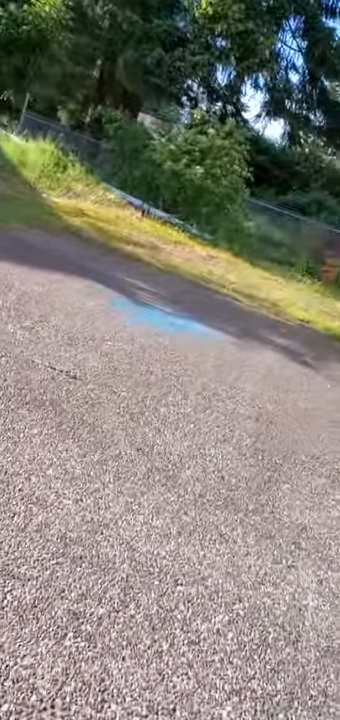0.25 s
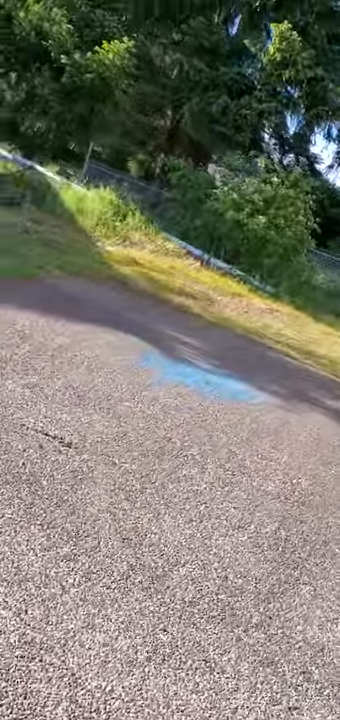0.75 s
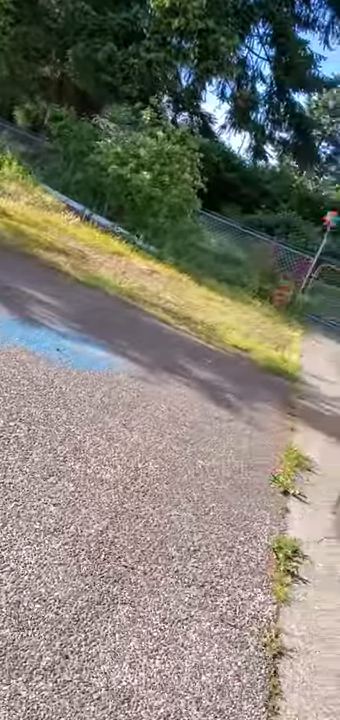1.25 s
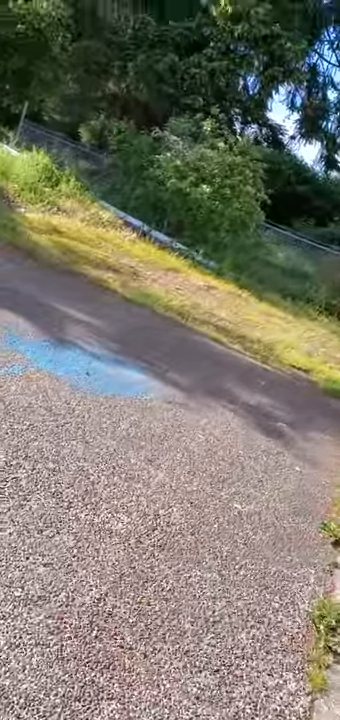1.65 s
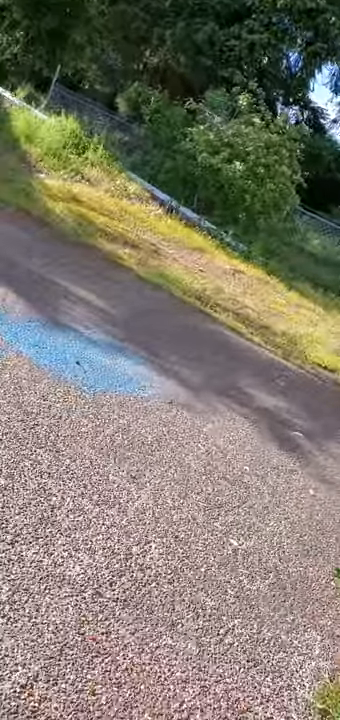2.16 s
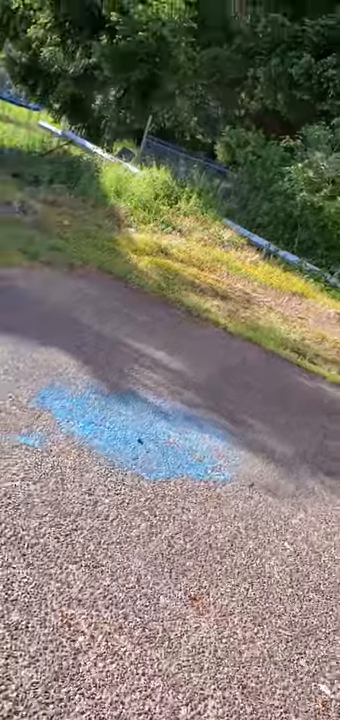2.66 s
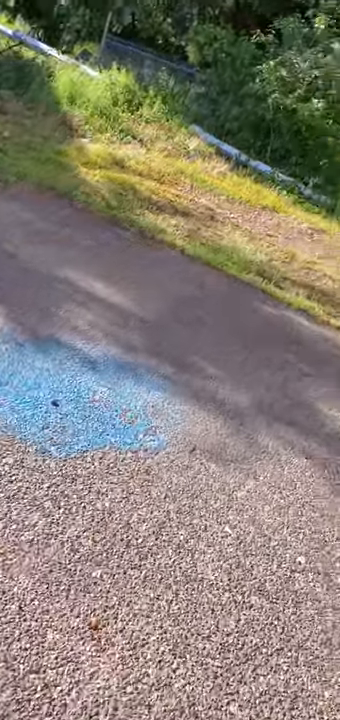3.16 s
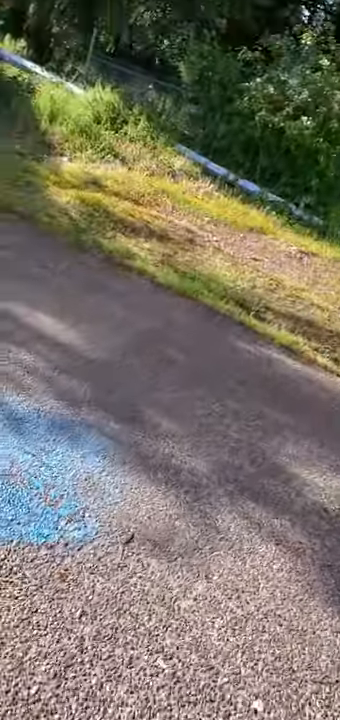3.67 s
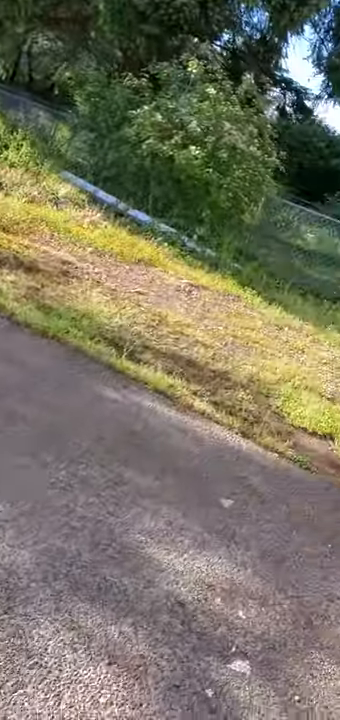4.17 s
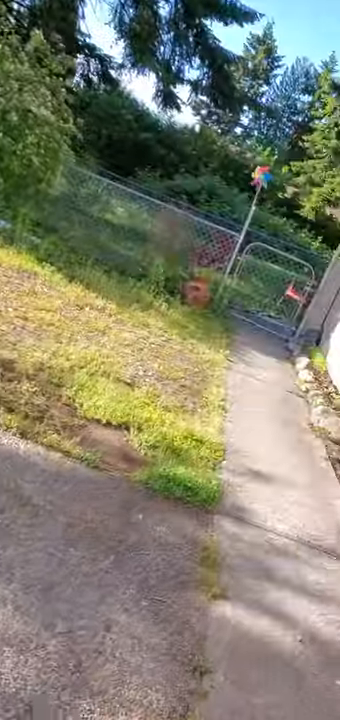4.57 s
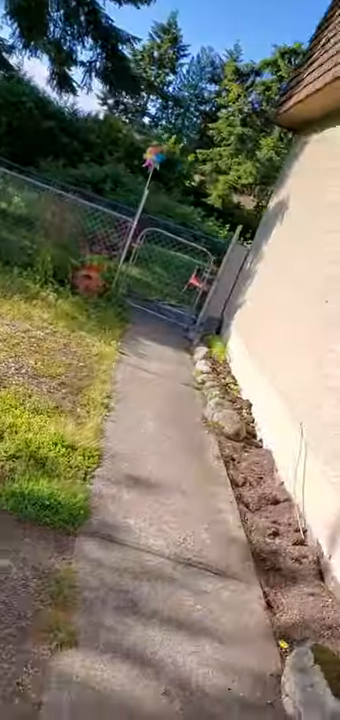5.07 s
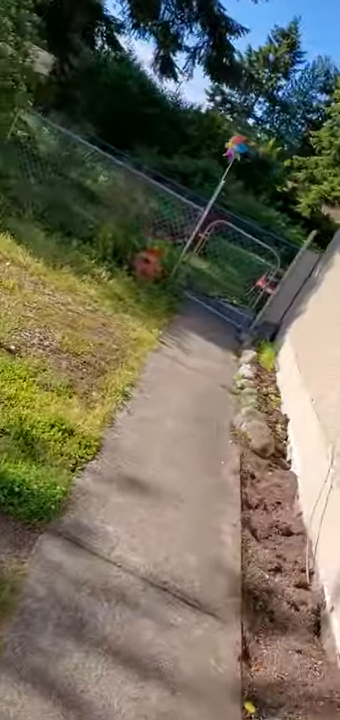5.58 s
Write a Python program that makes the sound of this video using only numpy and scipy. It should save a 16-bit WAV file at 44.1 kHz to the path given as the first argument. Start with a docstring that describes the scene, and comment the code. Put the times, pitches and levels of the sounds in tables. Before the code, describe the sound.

A plastic wheelie bin rumbles over rough asphalt, knocking and rattling, with crunching grit, shoe scuffs and some wind on the microphone.

```python
"""Rough asphalt road: a walker pulls a plastic wheelie bin.
Stones under the wheels shake the hollow body and rattle the walls; lid and axle knock, loose parts clack.
Grit crunches and snaps under tyres and shoes, scuffs hiss, the dry axle squeaks faintly.
Wind buffets the two microphone ports and slaps the left one, over a low road boom."""
import sys
import numpy as np
from scipy import signal
from scipy.fft import rfft, irfft
from scipy.io import wavfile
from scipy.ndimage import uniform_filter1d

SR = 44100
rng = np.random.default_rng(int(sys.argv[2]) if len(sys.argv) > 2 else 0)


def to_wav(sig):
    """Store sig (one row per channel, or 1-D mono) as 16-bit WAV at the path in sys.argv[1].

    Samples outside -1..1 are clipped; the rate is SR.
    """
    pcm = np.clip(np.atleast_2d(sig), -1, 1) * 32767
    pcm = np.round(pcm).astype(np.int16)
    wavfile.write(sys.argv[1], SR, pcm.T)  # frames by channels


N = 257419
TIME_S = np.arange(N) / SR
EVENT_N = 4000
EVENT_S = TIME_S[:EVENT_N]
LEFT_LAG_S, CUTOFF_HZ = 0.00022, 15880

# body modes; wall and lid modes: f/Hz, t60/s, level/dB
BODY_MODES = [(119, 0.084, -31), (135.7, 0.094, -2.5), (171.5, 0.055, -1.5), (200, 0.059, -3),
              (296.5, 0.032, -5), (351.2, 0.025, -4)]
WALL_MODES = [(301.4, 0.035, 0.5), (423, 0.034, 0), (513.6, 0.035, -2.5), (605, 0.021, -1),
              (773, 0.028, -6), (925, 0.015, -11), (1226, 0.021, -2), (1917, 0.011, -9)]
# plastic contact spectrum: f/Hz, level/dB
CONTACT_SPECTRUM = [(150, -9), (250, -12), (306, 3), (956, -13), (1290, -16.5), (1430, -18), (2050, -24),
                    (2360, -34.5), (3560, -43.5), (5000, -71), (6500, -86), (11000, -120)]
# two lowest body modes as the bin leans: t/s, gain/dB
LEAN_GAIN = [(0.0, 1), (1.0, -0.5), (1.9, -1), (2.2, 1.5), (3.5, -2.5), (4.6, 3), (5.0, -2), (5.84, 3)]
# rolling envelope: t/s, rumble/dB, rattle/dB
ROLL_LEVELS = [(0.0, -30, -28), (0.05, -18.5, -21), (0.17, -24, -34.5), (0.45, -25, -33.5),
               (0.54, -16.5, -26.5), (0.62, -27.5, -34.5), (0.76, -18, -32), (0.85, -27, -32.5),
               (1.0, -27, -37), (1.22, -19, -28), (1.41, -25, -37.5), (1.58, -22, -34.5), (1.8, -19, -31),
               (1.9, -31, -37.5), (2.08, -28.5, -45.5), (2.21, -16, -34), (2.44, -25.5, -40),
               (2.86, -19, -32.5), (2.95, -25.5, -36.5), (3.08, -25, -42), (3.4, -16.5, -31.5),
               (3.58, -21, -40.5), (3.76, -20, -34), (4.0, -21.5, -34.5), (4.1, -24.5, -38),
               (4.6, -19.5, -35.5), (4.7, -26, -40), (4.87, -24.5, -38.5), (5.0, -20, -40), (5.4, -27, -41),
               (5.84, -30, -46)]

def rolling():
    """One stream of stone bumps shakes the body, rattles the walls and clatters the plastic."""
    rumble_db, rattle_db = curve(ROLL_LEVELS), curve(ROLL_LEVELS, column=2)
    road = stones(per_s=900, spread_db=2.67)
    body_bumps = road ** 0.79 * amp(1.04 * flicker(hz=25))
    body = amp(rumble_db) * shaken(BODY_MODES, body_bumps, contact_s=0.0025, low_gain=amp(curve(LEAN_GAIN)))
    # bumps are blunter than knocks
    dull_modes = [(hz, 0.79 * t60, db - 3.2 * np.log2(hz / 400)) for hz, t60, db in WALL_MODES]
    walls = amp(rattle_db) * shaken(dull_modes, road, contact_s=0.00073)
    contacts = rng.standard_normal(N) * bursts(road, t60_s=0.012)
    clatter = unit_rms(coloured(contacts, CONTACT_SPECTRUM))
    return body + walls + amp(rattle_db - 0.5) * clatter


# lid and axle knocks: t/s, wall level/dB, thud level/dB, hardness tilt/(dB/oct)
KNOCK_HITS = [(0.036, -16, -11, 3.5), (0.053, -14, -32, 0.5), (0.075, -31, -25, 2), (0.1014, -19, -6.5, -3),
              (0.331, -13.5, -5, -9.5), (0.522, -21, -17, 4.5), (0.538, -11, -6, 0.5),
              (0.574, -20, -11.5, -0.5), (1.134, -21.5, -27, 5.5), (1.217, -14, -24, 1.5),
              (1.246, -12, -13, -7), (1.306, -19, -27, -6), (1.347, -15, -42, -4), (1.491, -15, -33, 1.5),
              (1.557, -13.5, -11.5, 0), (1.584, -11, -25, -1), (1.82, -9.5, -46, -3.5),
              (2.158, -20, -16, -1), (2.212, -6, -4.5, -7), (2.663, -14, -9.5, -6.5), (2.683, -19, -37, -3),
              (2.766, -11.5, -37, -5), (2.794, -10.5, -7, 2.5), (2.904, -30.5, -5, 16),
              (3.113, -24, -12.5, 9), (3.12, -18, -14, 2), (3.13, -11, -7, 0), (3.213, -12.5, -31, 2.5),
              (3.22, -9, -25, 1), (3.413, -14, -11, -3), (3.777, -15.5, -19, -0.5),
              (3.916, -15.5, -8.5, -8), (3.968, -10, 0, 5.5), (3.979, -10.5, -27, 1),
              (4.001, -12.5, -11.5, 1.5), (4.02, -17.5, -24, 2.5), (4.351, -13, -21, -4),
              (4.383, -7.5, -7.5, 1.5), (4.426, -16, -25, -2.5), (4.465, -13, -32, 3),
              (4.525, -17.5, -11, 0), (4.574, -22, -11.5, -0.5), (4.598, -35, -10, -4),
              (4.611, -10.5, -7, -0.5), (4.71, -12.5, -8.5, -5), (4.856, -22, -14, -0.5),
              (4.992, -17.5, -10, 2), (5.129, -18.5, -15, 1), (5.265, -12, -25, -6.5),
              (5.449, -16.5, -39, 0), (5.509, -17.5, -24, -3), (5.603, -14, -9, -6.5),
              (5.686, -19, -25, -10)]
BOUNCES, BOUNCE_GAP_S, BOUNCE_STEP_DB = 4, 0.008, -10.5

def knocks():
    """Uneven bounces ring the walls and crack through loose parts; the first blow thuds the body."""
    out, bounce = np.zeros(N), np.arange(BOUNCES)
    rebound = bounce > 0
    mode_hz, bin_hz = np.transpose(WALL_MODES)[0], np.fft.rfftfreq(EVENT_N, 1 / SR)
    wall_rings = np.array(rings(WALL_MODES, contact_s=0.0014))
    for start_s, wall_db, thud_db, tilt_db in KNOCK_HITS:
        draws, noise = rng.standard_normal(80), rng.standard_normal(EVENT_N)
        jitter = np.tanh(draws)
        delays_s = np.cumsum(rebound * BOUNCE_GAP_S * np.exp(0.473 * jitter[:BOUNCES]))
        sizes = amp(BOUNCE_STEP_DB * bounce + 1.7 * rebound * jitter[8:8 + BOUNCES])
        scatter_db = 3.9 * jitter[20:20 + BOUNCES * len(mode_hz)].reshape(BOUNCES, -1)
        ring = np.zeros(EVENT_N)
        for delay_s, size, mode_db in zip(delays_s, sizes, scatter_db):
            add(ring, delay_s, size * amp(tilt_db * np.log2(mode_hz / 1000) + mode_db) @ wall_rings)
        crack_db = db_at(CONTACT_SPECTRUM, bin_hz) + tilt_db * np.log2(np.clip(bin_hz, 200, 3500) / 1000)
        age_s = np.maximum(EVENT_S - delays_s[:, None], 0)
        envelope = sizes @ (np.minimum(age_s / 0.0021, 1) * amp(-60 * age_s / 0.051))
        crack = unit_rms(irfft(rfft(noise) * amp(crack_db))) * envelope
        walls = amp(wall_db) * (0.79 * ring / abs(ring).max() + amp(-6.5) * crack)
        add(out, start_s, walls + thud(amp(thud_db), detune=0.021 * draws[16]))
    return out


def thud(blow, detune, rise_s=0.0012):
    """The bin floor flexes; a heavier blow swings lower and longer."""
    hz = (205 - 58 * blow) * (1 + detune)
    length_s = 0.0034 + 0.0094 * blow
    envelope = np.tanh(EVENT_S / rise_s) * np.exp(-(EVENT_S / length_s) ** 4)
    return blow * envelope * np.sin(2 * np.pi * hz * EVENT_S)


# stone and loose-part impacts: t/s, level/dB, f/Hz, t60/s
CLACK_HITS = [(0.3992, -22, 1985, 0.035), (1.182, -15, 1210, 0.018), (1.4537, -23.5, 2000, 0.04),
              (0.478, -27.5, 2210, 0.017), (3.727, -18, 1940, 0.014), (3.736, -26, 1940, 0.029),
              (3.968, -7, 1330, 0.034), (3.975, -8, 867, 0.035), (4.8565, -18.5, 1650, 0.029)]

def clacks():
    """Small stones and loose plastic strike: a short, rough three-mode ring."""
    out = np.zeros(N)
    for start_s, db, hz, t60_s in CLACK_HITS:
        modes = [(hz, t60_s, db), (1.12 * hz, t60_s, db - 12), (1.85 * hz, t60_s, db - 18)]
        ring = sum(rings(modes, contact_s=0.0005))
        grain = uniform_filter1d(uniform_filter1d(rng.standard_normal(EVENT_N), size=60), size=60)
        rough = ring * (0.8 + 0.45 * unit_rms(grain))
        add(out, start_s, rough * np.linalg.norm(ring) / np.linalg.norm(rough))
    return out


# grit and tread spectra: f/Hz, level/dB
GRIT_SPECTRUM = [(1200, 6), (2050, 7), (2700, 3), (3700, -1), (4500, -6.5), (5500, -6.5), (9000, -14),
                 (15000, -13)]
TREAD_SPECTRUM = [(120, -3.5), (200, -2), (258, -4.5), (340, -5.5), (946, -18), (1220, -41.5),
                  (1700, -26.5), (15800, -62)]

def crunch():
    """Fine grit crunches under tread and shoes, over a tyre wash that follows the rattle."""
    grains = noise_pair() * bursts(stones(per_s=500, spread_db=2.1), t60_s=0.036)
    grit = unit_rms(patchy(coloured(grains, GRIT_SPECTRUM)))
    wash = unit_rms(coloured(noise_pair(), TREAD_SPECTRUM))
    rattle_db = curve(ROLL_LEVELS, column=2)
    wash_db = -35.5 + 0.73 * (rattle_db - rattle_db.mean())
    return scuff_gain(column=1) * grit + amp(wash_db) * wash


# grit cracks: t/s, peak/dB, f/Hz, t60/s, left-right/dB
GRIT_SNAPS = [(0.208, -41, 3000, 0.25, 12), (0.293, -46, 12000, 0.01, 0), (0.399, -47, 3710, 0.038, -24),
              (0.478, -43, 3270, 0.031, 6), (0.947, -35, 11000, 0.015, 5), (1.068, -33.5, 3200, 0.091, 1),
              (1.7185, -41, 11000, 0.012, 1), (1.8367, -41, 9000, 0.013, -2),
              (2.0334, -38, 9000, 0.015, -4), (2.1864, -38, 9000, 0.012, 0),
              (2.2533, -38, 13000, 0.012, -2), (2.5594, -35, 5300, 0.12, -1),
              (2.7914, -35, 10000, 0.017, -5), (2.8424, -45, 12000, 0.012, 0),
              (2.868, -41, 9000, 0.012, -3), (2.906, -42, 3500, 0.035, 3), (3.122, -21.5, 3200, 0.07, -2),
              (3.13, -22, 3450, 0.04, 9), (3.1985, -29, 14000, 0.015, -2), (3.215, -32.5, 3510, 0.051, 0.5),
              (3.4156, -34, 4460, 0.024, 6), (3.511, -32, 3210, 0.032, 2), (3.553, -33, 8000, 0.015, 10),
              (3.561, -24, 12000, 0.02, 0), (3.565, -23.5, 11300, 0.019, 14),
              (3.5674, -27, 5000, 0.0098, 1), (3.578, -19, 9100, 0.022, 3),
              (3.589, -23.5, 3850, 0.0063, 12), (3.8696, -36, 12700, 0.025, -1),
              (3.8832, -29, 3230, 0.04, 3), (3.957, -30, 11000, 0.0091, 1), (3.9642, -29, 3510, 0.037, 2),
              (3.97, -33, 3640, 0.045, 12), (4.047, -37.5, 3760, 0.04, 3), (4.1308, -28.5, 3440, 0.056, 2),
              (4.8558, -26.5, 3600, 0.081, 1), (4.9, -37, 6000, 0.015, 0), (5.1113, -43, 11000, 0.012, 5),
              (5.3313, -38, 13000, 0.015, 2), (5.688, -43, 9000, 0.015, 2)]

def snaps():
    """Grit cracks under a wheel or shoe: a noise burst around one broad resonance."""
    out = np.zeros((2, N))
    band = signal.butter(1, [1500, 9000], "band", fs=SR)
    for start_s, db, hz, t60_s, pan_db in GRIT_SNAPS:
        noise = noise_pair(EVENT_N, own_gain=1.6)
        resonance = signal.iirpeak(hz, Q=2.5, fs=SR)
        envelope = amp(-60 * EVENT_S / t60_s) * (1 - np.exp(-EVENT_S / 0.00018))
        burst = (0.24 * signal.lfilter(*band, noise) + signal.lfilter(*resonance, noise)) * envelope
        add(out, start_s, amp(db) * pan(pan_db) * burst / abs(burst).max())
    return out


# shoe scuffs: t/s, rise/s, fall/s, crunch/dB, hiss/dB
SHOE_SCUFFS = [(0.34, 0.04, 0.044, -39.5, -58), (0.47, 0.01, 0.1, -41, -72),
               (0.53, 0.037, 0.071, -45, -47.5), (0.83, 0.05, 0.096, -43.5, -50.5),
               (0.985, 0.03, 0.061, -50, -52), (1.06, 0.033, 0.08, -50, -54),
               (1.34, 0.03, 0.043, -40.5, -60), (1.41, 0.021, 0.074, -46.5, -68),
               (2.99, 0.055, 0.27, -49, -53.5), (3.1, 0.013, 0.16, -39.5, -61),
               (3.2, 0.12, 0.086, -50, -49), (3.556, 0.01, 0.063, -41, -33), (3.59, 0.027, 0.19, -61, -50),
               (3.66, 0.073, 0.035, -39, -47), (3.86, 0.021, 0.055, -47.5, -56),
               (4.123, 0.011, 0.038, -37, -52), (4.843, 0.015, 0.062, -51, -50),
               (5.24, 0.12, 0.021, -41.5, -46), (5.47, 0.059, 0.07, -46, -55.5)]
# bed between scuffs: t/s, crunch/dB, hiss/dB
BED_LEVELS = [(0.0, -49, -56), (0.45, -47.5, -62), (0.75, -54, -84), (1.2, -58, -62), (1.93, -51, -64.5),
              (2.03, -48, -58), (2.4, -53, -60), (2.8, -49, -57), (2.96, -52.5, -65), (3.45, -50.5, -60),
              (4.08, -47, -63), (4.4, -52, -62), (5.0, -52.5, -62), (5.84, -54.5, -60)]

def scuff_gain(column, fall_db=-14.5):
    """Each shoe scuff swells and fades over a slow bed; column 1 is crunch, 2 is hiss."""
    power = amp(curve(BED_LEVELS, column)) ** 2
    for start_s, rise_s, fall_s, *levels_db in SHOE_SCUFFS:
        t = np.arange(0, rise_s + 2 * fall_s, 1 / SR)
        envelope = np.minimum(t / rise_s, 1) * amp(fall_db * (np.maximum(t - rise_s, 0) / fall_s) ** 2)
        add(power, start_s, (amp(levels_db[column - 1]) * envelope) ** 2)
    return np.sqrt(power)


# scuff hiss spectrum: f/Hz, level/dB
HISS_SPECTRUM = [(3530, -56), (6000, -11), (7470, -6.5), (8260, -24), (9070, -12), (10100, -15.5),
                 (11200, -1), (11900, -5), (12750, -2.5), (14000, -12), (15100, -3), (15800, -11.5)]

def hiss():
    """Airy scuffing in the top octave, stronger on the left, flatter between scuffs."""
    grain = amp(1.2 * flicker(hz=60))
    flat_spectrum = [(hz, 0.3 * db) for hz, db in HISS_SPECTRUM]
    peaked = unit_rms(patchy(coloured(noise_pair() * grain, HISS_SPECTRUM)))
    flat = unit_rms(patchy(coloured(noise_pair() * grain, flat_spectrum)))
    bed = amp(curve(BED_LEVELS, column=2))
    swell = np.sqrt(abs(scuff_gain(column=2) ** 2 - bed ** 2))
    return pan(3) * (swell * peaked + bed * flat)


# axle glides: t/s, length/s, start f/Hz, end f/Hz, level/dB
AXLE_GLIDES = [(0.103, 0.04, 12700, 15300, -72), (0.264, 0.02, 14500, 12500, -66),
               (0.35, 0.021, 14000, 12950, -68), (2.248, 0.027, 12000, 11800, -66),
               (2.298, 0.03, 12700, 13350, -72), (2.328, 0.04, 13050, 12200, -72),
               (2.39, 0.022, 13000, 12100, -75), (2.382, 0.04, 13500, 13100, -73),
               (2.41, 0.045, 13200, 13700, -71), (2.71, 0.04, 11800, 12600, -73),
               (3.734, 0.019, 12850, 11800, -53), (3.766, 0.074, 15700, 10760, -65)]

def squeaks():
    """The dry axle whistles in thin, shaky glides."""
    out = np.zeros(N)
    wobble_hz, tremor_db = 60 * flicker(hz=300), 3 * flicker(hz=250)
    for start_s, length_s, start_hz, end_hz, db in AXLE_GLIDES:
        n = round(length_s * SR)
        hz = np.linspace(start_hz, end_hz, n) + wobble_hz[round(start_s * SR):][:n]
        tone = np.sqrt(2) * np.sin(2 * np.pi * np.cumsum(hz) / SR)
        add(out, start_s, amp(db) * tone * signal.windows.tukey(n, 0.6))
    return out * amp(tremor_db)


# wind and boom spectrum: f/Hz, level/dB
GUST_SPECTRUM = [(15, -31), (28, 13.5), (60, 22.5), (95, 16.5), (140, 4), (250, -39.5)]
# wind and road boom envelopes: t/s, level/dB
WIND_LEVELS = [(0.0, -50), (0.26, -29.5), (0.5, -28), (0.63, -37), (0.89, -26), (1.02, -39), (1.74, -48),
               (2.29, -65), (3.15, -37), (3.5, -65), (5.84, -47)]
BOOM_LEVELS = [(0.0, -37), (0.13, -22), (0.26, -35), (0.5, -25), (0.89, -35), (0.95, -28), (1.9, -33),
               (2.3, -33), (3.0, -38), (3.15, -25), (3.3, -41), (3.75, -27.5), (4.4, -34.5), (5.4, -33.5),
               (5.53, -32), (5.84, -40)]
# left-port slaps: t/s, level/dB, f/Hz, length/cycles
WIND_SLAPS = [(0.921, -1.5, 161, 0.69), (0.932, 1.5, 445, 1.2), (0.938, 2, 65, 0.8)]

def wind_and_boom():
    """Wind buffets each port separately and slaps the left one; both share a low road boom."""
    boom, left, right = (unit_rms(coloured(rng.standard_normal(N), GUST_SPECTRUM)) for _ in range(3))
    gusts = np.array([left * amp(flicker(hz=11)), 1.7 * right * amp(0.73 * flicker(hz=4))])
    out = amp(curve(BOOM_LEVELS)) * boom + amp(curve(WIND_LEVELS)) * gusts
    for start_s, db, hz, cycles in WIND_SLAPS:
        turns = np.arange(0, cycles, hz / SR)
        add(out[0], start_s, -amp(db) * np.sin(2 * np.pi * turns) * np.sin(np.pi * turns / cycles))
    return out


# direct balance: f/Hz, left-right/dB
PORT_BALANCE = [(100, 0), (500, -1), (1300, -6), (2500, -2), (6000, 3)]
# reflected share: f/Hz, level/dB
ECHO_SPECTRUM = [(100, -46), (300, -6), (650, -4.5), (3000, 3), (10000, 10)]

def paths_to_ports(x, hop=1024, echo_t60_s=0.036):
    """Bin sound reaches the right port first; reflections off ground and walker change as they move."""
    hz = np.fft.rfftfreq(N, 1 / SR)
    side = amp(db_at(PORT_BALANCE, hz) / 2)
    lag = np.exp(-2j * np.pi * hz * LEFT_LAG_S)
    direct = irfft(rfft(x) * np.array([side * lag, 1 / side]), N)
    echoes = np.zeros((2, N))
    for start in range(0, N, hop):
        taps = rng.standard_normal((2, 1500)) * amp(-60 * TIME_S[:1500] / echo_t60_s)
        piece = x[start:start + 2 * hop]
        piece = piece * np.sin(np.pi * np.arange(len(piece)) / (2 * hop))
        add(echoes, start / SR, signal.fftconvolve(piece[None], taps / np.linalg.norm(taps[0]), axes=1))
    return direct + coloured(echoes * signal.windows.tukey(N, 400 / N), ECHO_SPECTRUM)


def stones(per_s, spread_db):
    """Random bumps of uneven size."""
    return amp(spread_db * np.minimum(rng.exponential(1, N), 4)) * (rng.random(N) < per_s / SR)


def rings(modes, contact_s):
    """One decaying sine per mode; blunt contact softens the onset."""
    onset = 1 - np.exp(-EVENT_S / contact_s)
    return [amp(db - 60 * EVENT_S / t60_s) * np.sin(2 * np.pi * hz * EVENT_S) * onset
            for hz, t60_s, db in modes]


def shaken(modes, bumps, contact_s, low_gain=1):
    """Bumps drive each mode with random strength and sign; low_gain weights the lowest two."""
    parts = [signal.oaconvolve(bumps * rng.standard_normal(N), ring)[:N]
             for ring in rings(modes, contact_s)]
    return unit_rms(low_gain * sum(parts[:2]) + sum(parts[2:]))


def bursts(bumps, t60_s):
    """Envelope that jumps at each bump, then decays."""
    return signal.lfilter([1], [1, -amp(-60 / (t60_s * SR))], bumps)


def noise_pair(n=N, own_gain=1):
    """Shared noise, later on the left, plus each port's own."""
    common, left, right = rng.standard_normal((3, n))
    return np.array([np.roll(common, round(LEFT_LAG_S * SR)) + own_gain * left, common + own_gain * right])


def patchy(x, depth_db=1):
    """Random level patches in time and frequency."""
    frames = signal.stft(x, nperseg=512)[2]
    patches = uniform_filter1d(rng.standard_normal(frames.shape[1:]), size=24, axis=0)
    patches = uniform_filter1d(patches, size=12, axis=1)
    return signal.istft(frames * amp(depth_db * unit_rms(patches)), nperseg=512)[1][:, :N]


def flicker(hz):
    """Unit-rms wobble, low-passed at hz."""
    return unit_rms(signal.lfilter(*signal.butter(2, hz, fs=SR), rng.standard_normal(N)))


def coloured(x, spectrum):
    return irfft(rfft(x) * amp(db_at(spectrum, np.fft.rfftfreq(N, 1 / SR))), N)


def db_at(spectrum, hz):
    points_hz, db = np.transpose(spectrum)
    return np.interp(np.log(hz + 1), np.log(points_hz + 1), db)


def curve(table, column=1):
    rows = np.asarray(table)
    return np.interp(TIME_S, rows[:, 0], rows[:, column])


def amp(db):
    return 10 ** (np.asarray(db) / 20)


def pan(left_right_db):
    return amp([[left_right_db / 2], [-left_right_db / 2]])


def unit_rms(x):
    return x / np.sqrt(np.mean(x ** 2) + 1e-20)


def add(mix, start_s, sound):
    part = mix[..., round(start_s * SR):][..., :sound.shape[-1]]
    part += sound[..., :part.shape[-1]]


def scene():
    """Bin with its reflections, plus grit, shoes and wind."""
    wheelie_bin = rolling() + knocks() + clacks() + squeaks()
    return paths_to_ports(wheelie_bin) + crunch() + snaps() + hiss() + wind_and_boom()


def record(dry):
    """Microphone: 32 Hz high-pass, soft clip, band limit."""
    thinned = signal.lfilter(*signal.butter(3, 32, "high", fs=SR), dry)
    rounded = thinned / (1 + abs(thinned) ** 12) ** (1 / 12)
    padded = np.pad(rounded, [(0, 0), (255, 255)], "reflect")
    lowpass = signal.firwin(511, CUTOFF_HZ, window=("kaiser", 9), fs=SR)
    return signal.oaconvolve(padded, lowpass[None], "valid", axes=1)


dry = scene()
out = record(dry)
to_wav(out)
```